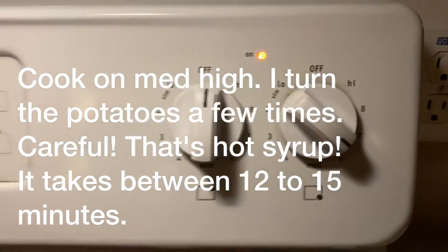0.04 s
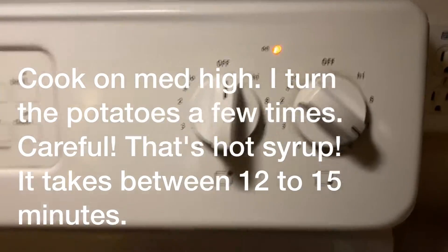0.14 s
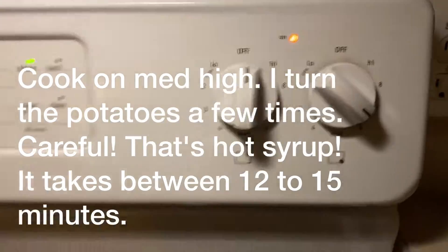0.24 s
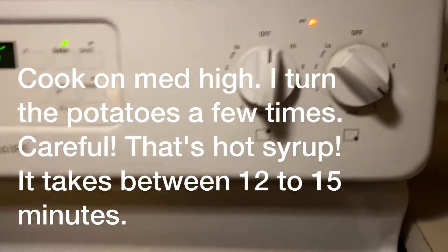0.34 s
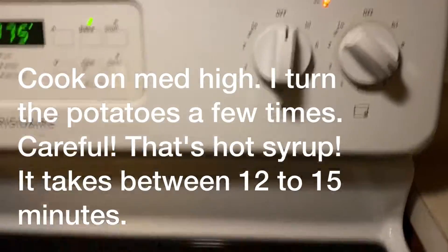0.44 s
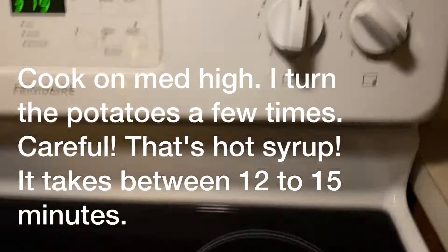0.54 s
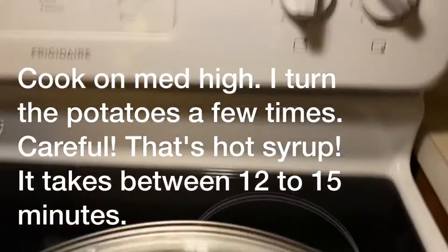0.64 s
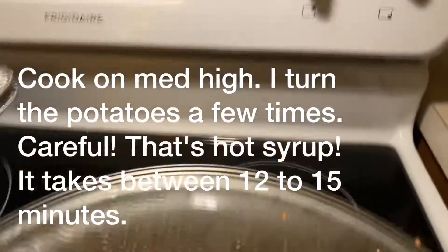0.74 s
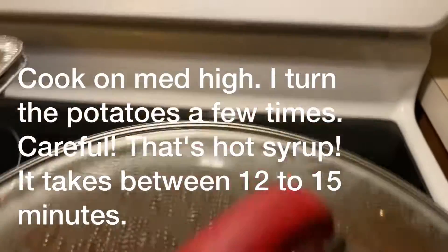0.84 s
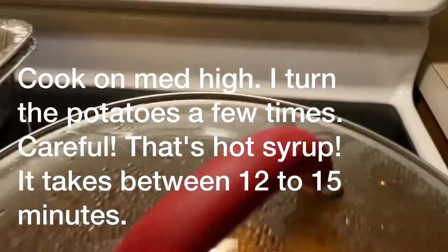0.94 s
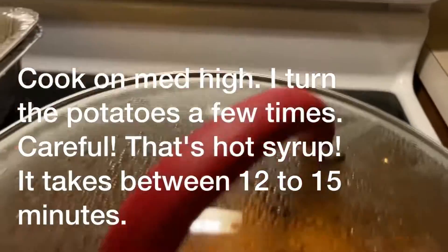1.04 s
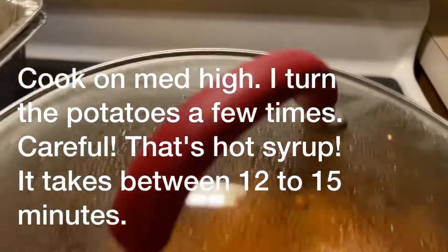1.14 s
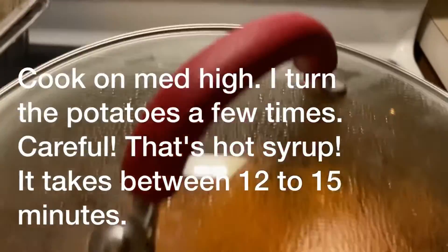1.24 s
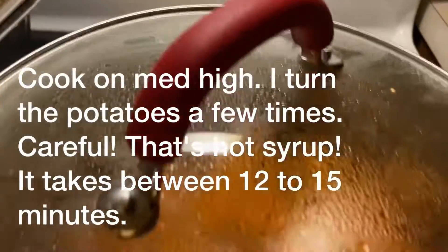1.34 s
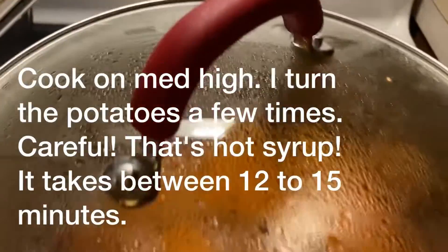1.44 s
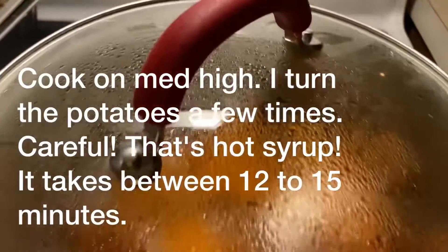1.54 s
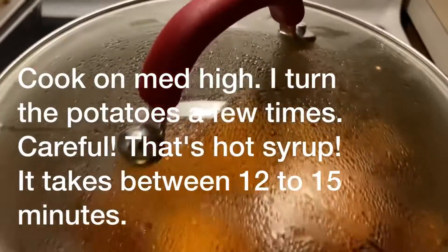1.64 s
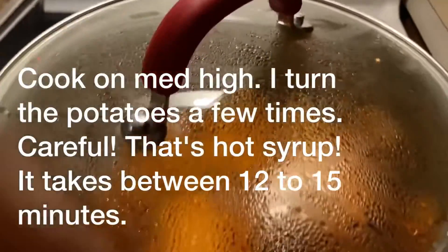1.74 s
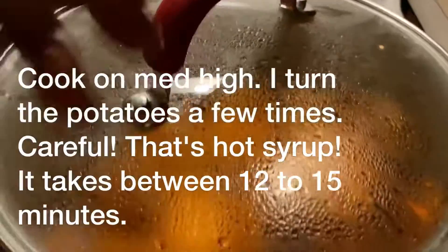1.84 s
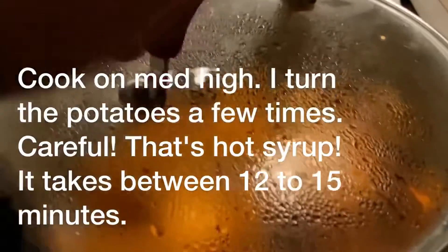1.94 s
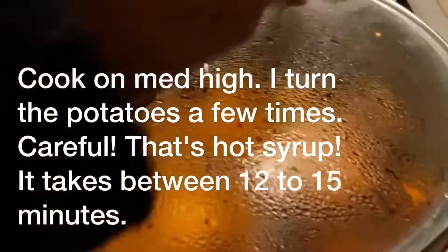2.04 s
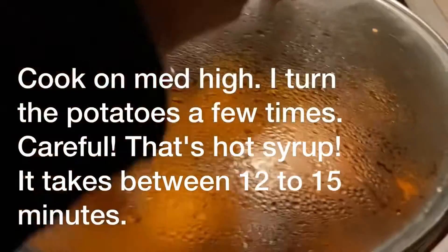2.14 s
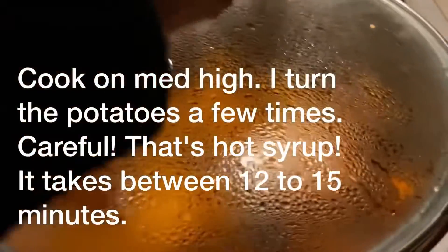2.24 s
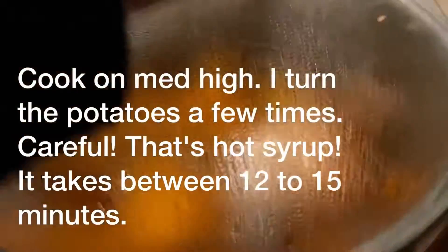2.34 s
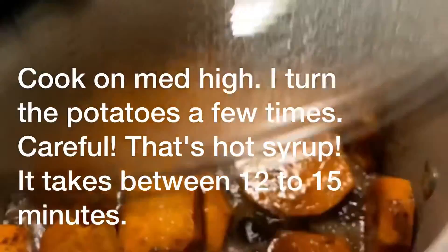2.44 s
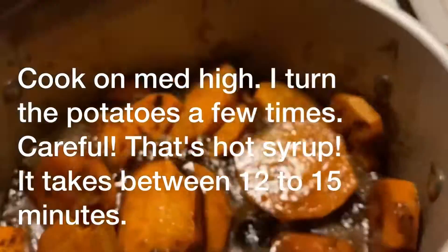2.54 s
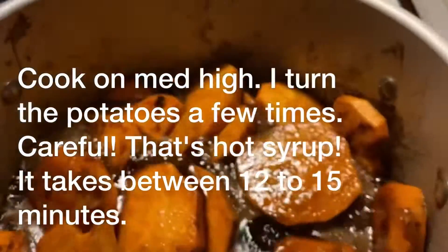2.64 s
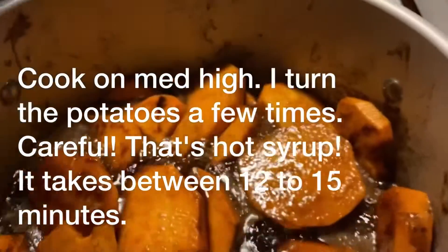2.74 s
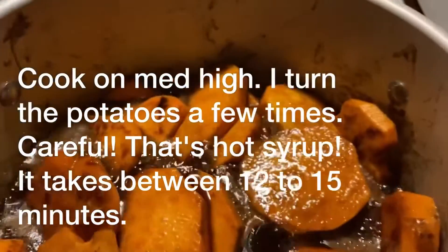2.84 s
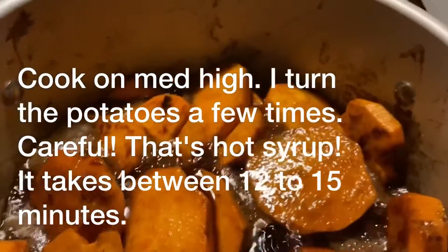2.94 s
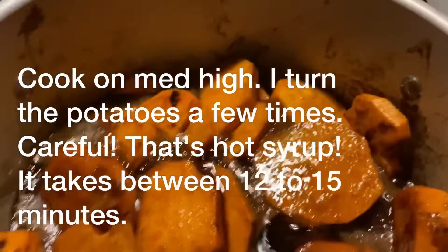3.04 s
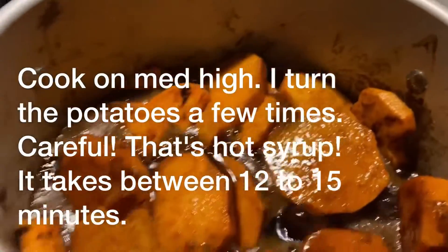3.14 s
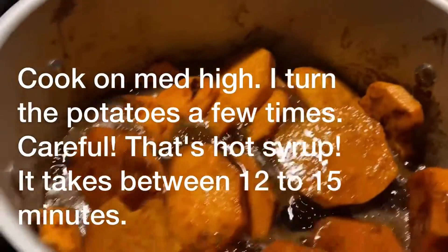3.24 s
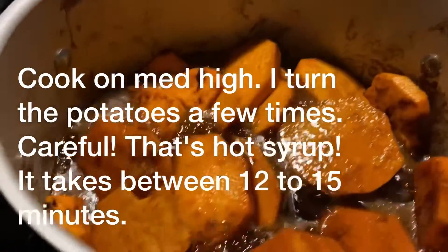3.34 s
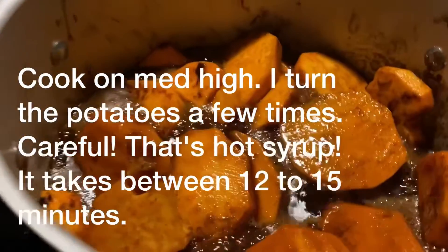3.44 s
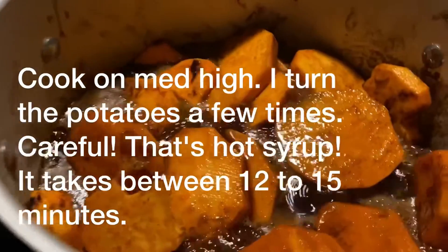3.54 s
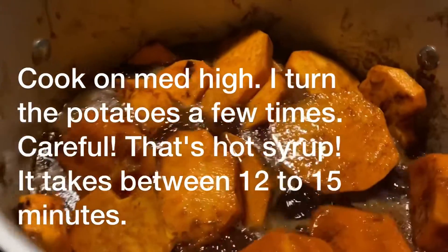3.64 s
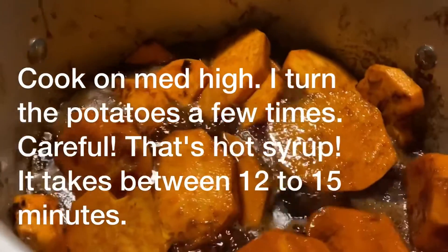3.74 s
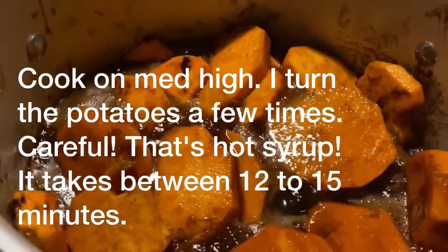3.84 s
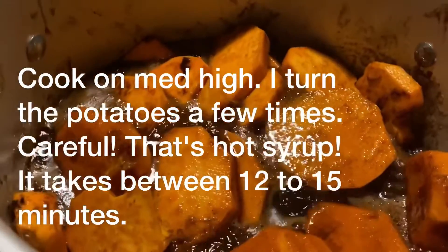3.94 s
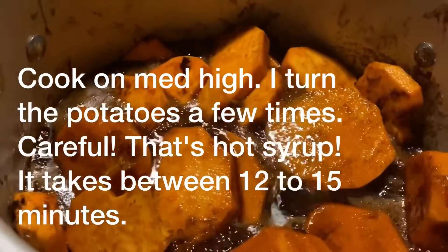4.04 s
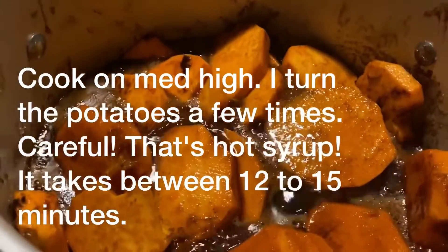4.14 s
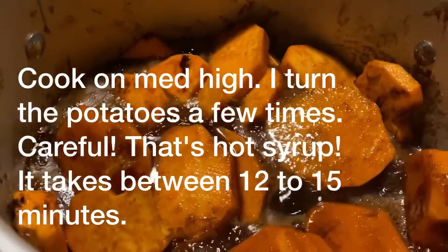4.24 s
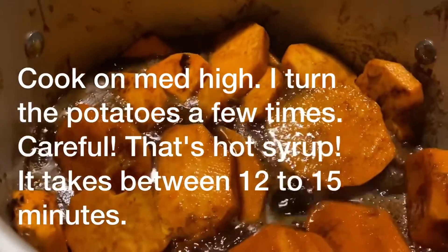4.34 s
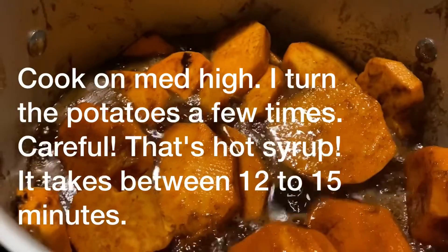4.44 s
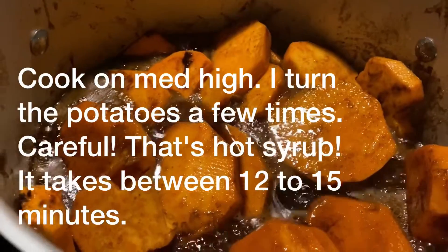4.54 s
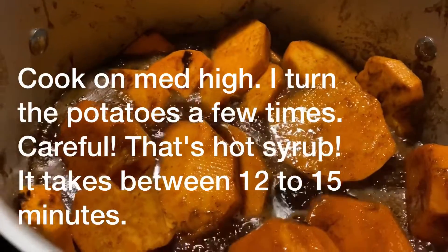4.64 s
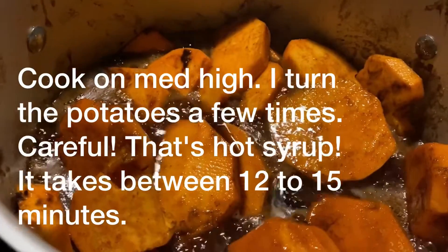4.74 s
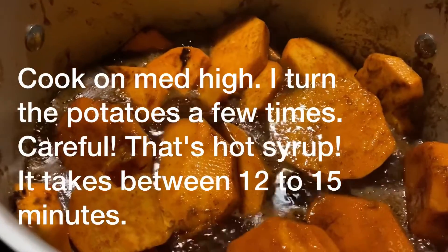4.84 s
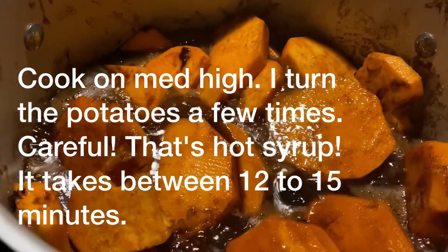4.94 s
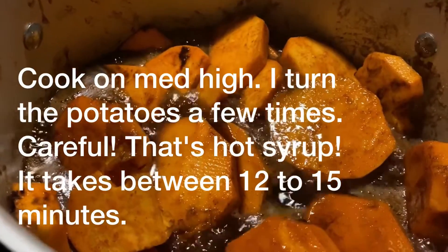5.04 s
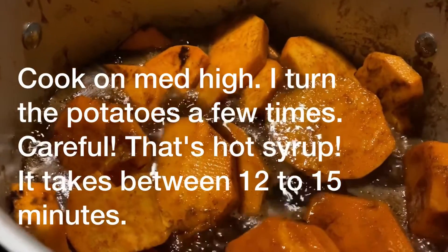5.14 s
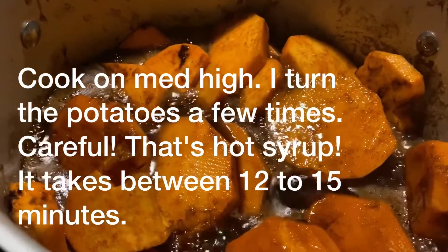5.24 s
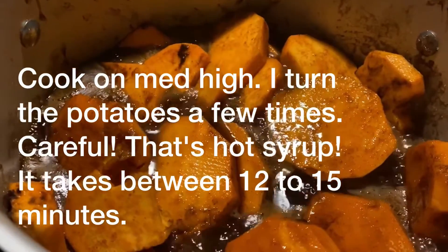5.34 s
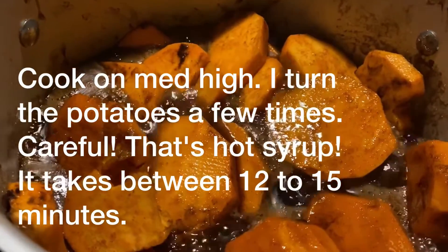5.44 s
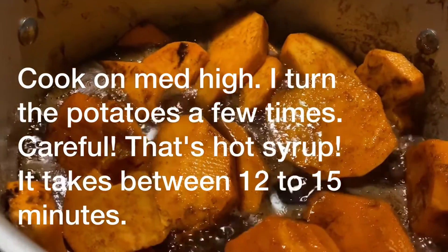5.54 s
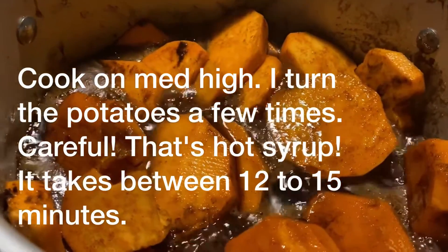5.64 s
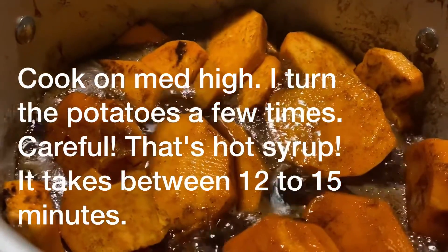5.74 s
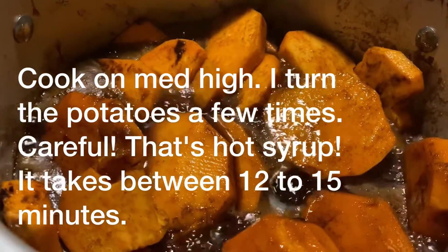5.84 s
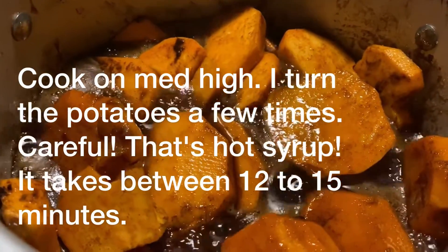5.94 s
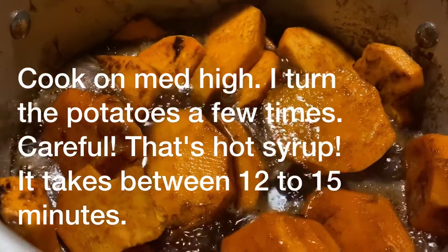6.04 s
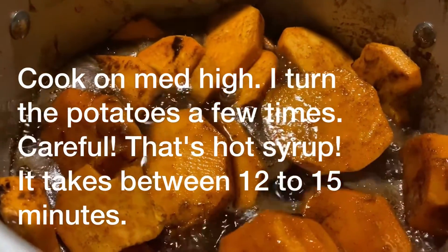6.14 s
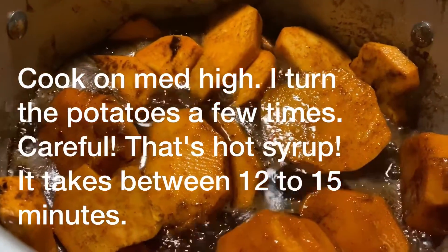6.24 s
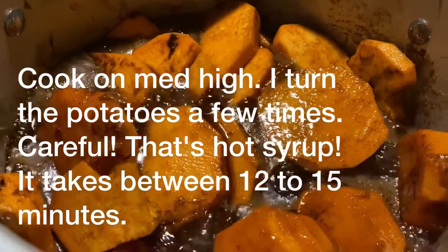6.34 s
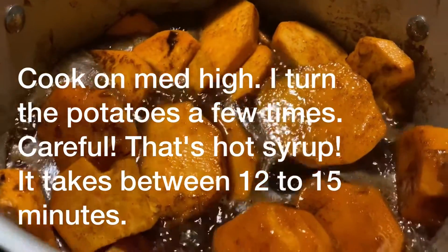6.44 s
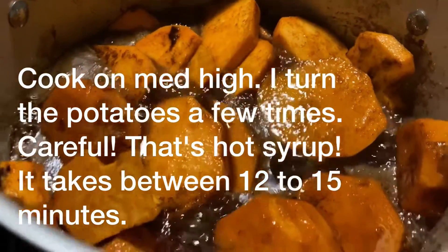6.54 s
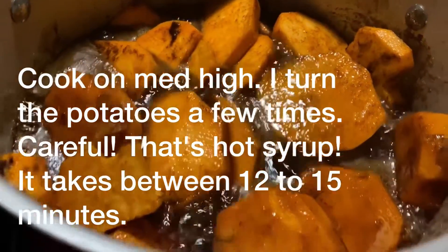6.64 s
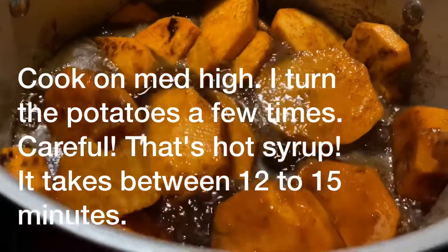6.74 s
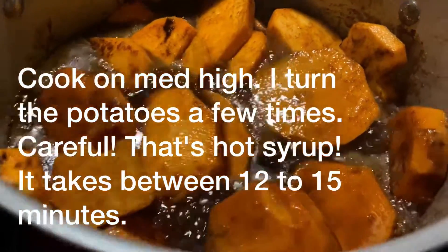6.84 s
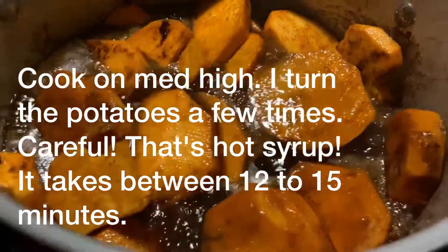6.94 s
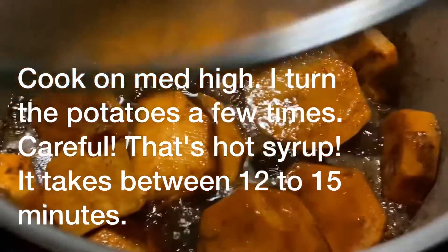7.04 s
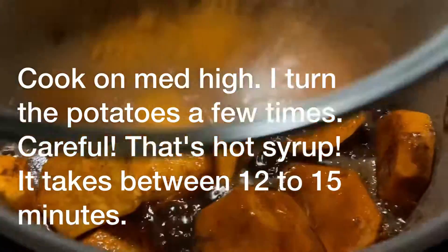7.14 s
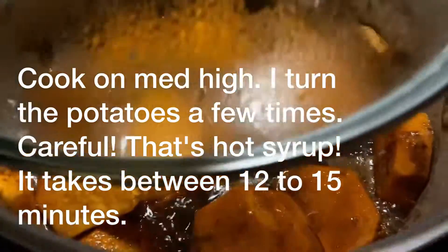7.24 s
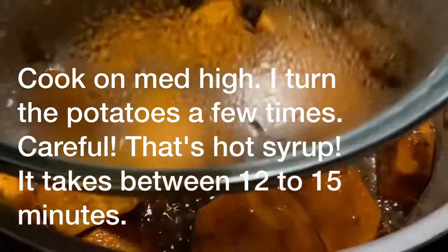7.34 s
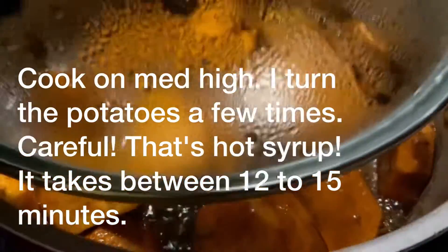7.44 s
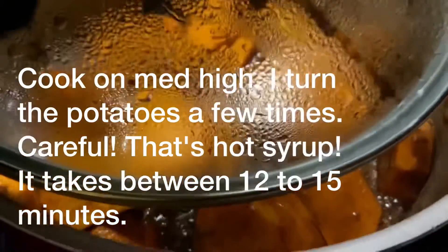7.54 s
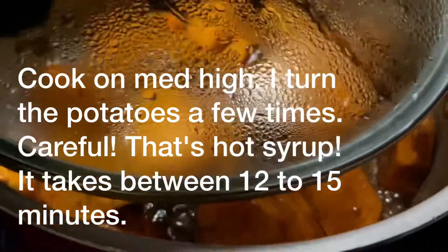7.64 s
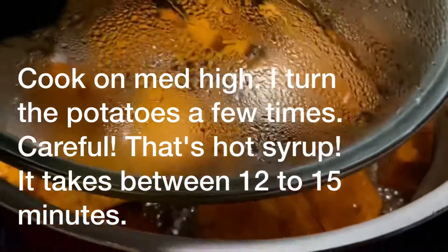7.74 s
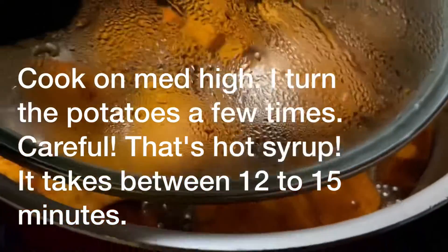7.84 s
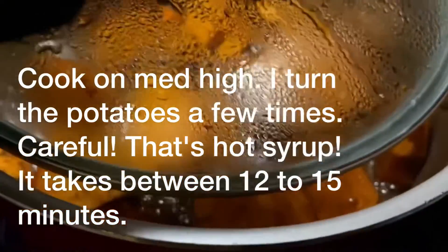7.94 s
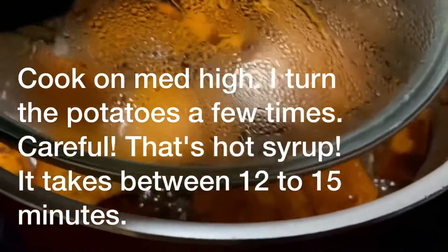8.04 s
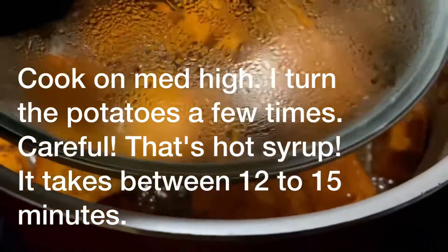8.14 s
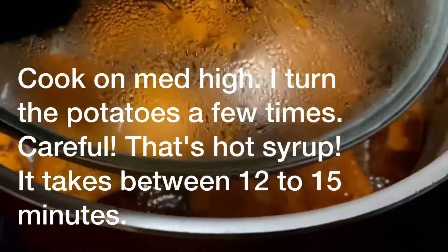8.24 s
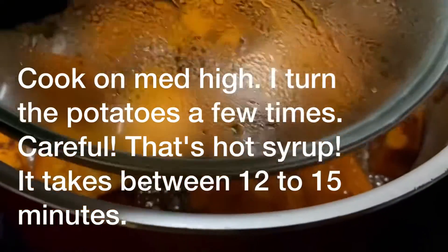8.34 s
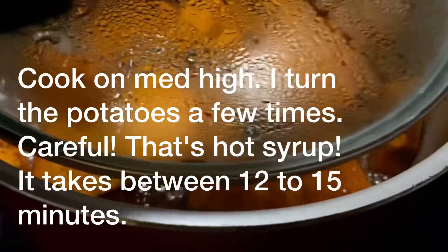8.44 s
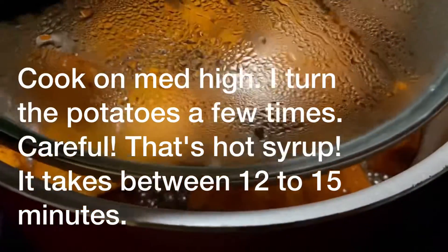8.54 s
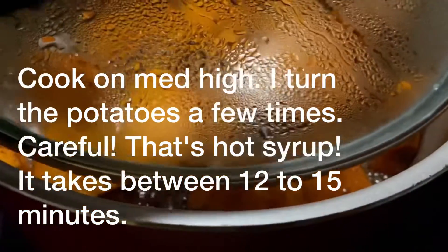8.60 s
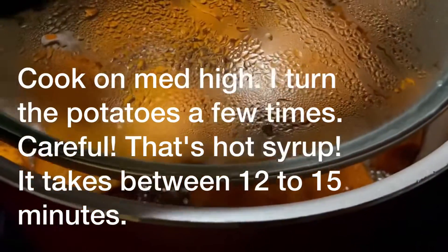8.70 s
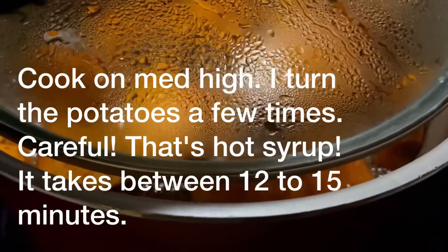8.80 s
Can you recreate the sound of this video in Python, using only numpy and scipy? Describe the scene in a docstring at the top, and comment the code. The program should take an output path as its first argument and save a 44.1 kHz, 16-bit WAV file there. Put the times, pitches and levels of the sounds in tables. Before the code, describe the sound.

Thick syrup gulps muffled under a glass lid, then bubbles open and crackling, before the lid clanks and scrapes back on, ajar.

```python
"""Thick syrup boils around sliced vegetables in a pot, heard from close above: damped sines gulp and blip
as bubbles, coloured by the pot's air resonances, which sound hollow and muffled under the glass lid.
Random ruptures make crackle, spatter and fizzing swells; shaped noise makes snaps, hiss, rubs, rumble and air.
The lid is lifted, the boil is heard open, then the lid knocks and scrapes back on as decaying struck modes
and chattering noise, and is left ajar."""
import sys
import numpy as np
from scipy import signal
from scipy.fft import rfft, irfft, next_fast_len
from scipy.io import wavfile
from scipy.ndimage import map_coordinates

SR = 44100
rng = np.random.default_rng(int(sys.argv[2]) if len(sys.argv) > 2 else 0)


def bounce(signal):
    """Save signal as a 16-bit WAV file at the path given by the first command-line argument."""
    frames = np.transpose(np.atleast_2d(signal))
    limited = np.clip(frames, -1, 1)
    pcm = np.round(limited * 32767).astype(np.int16)
    wavfile.write(sys.argv[1], SR, pcm)


N = 391166


def amp(db):
    """The decibel law: amplitude ratio of a level."""
    return 10 ** (np.asarray(db) / 20)


def unit(x):
    """Normalisation to an rms of 1."""
    return x / np.sqrt(np.mean(x ** 2) + 1e-20)


def peaked(x):
    """Normalisation to a peak of 1."""
    return x / (np.abs(x).max() + 1e-20)


def along(points, hz):
    """Interpolation of (Hz, value) points on a logarithmic frequency axis."""
    f, v = np.transpose(points)
    return np.interp(np.log(hz + 1), np.log(f + 1), v)


def curves(rows):
    """Linear interpolation in time: one value per sample for each column after the seconds."""
    s, *cols = np.transpose(rows)
    return [np.interp(np.arange(N) / SR, s, c) for c in cols]


def wobble(rate):
    """Band-limited random motion: a smooth curve through rate random knots a second."""
    return map_coordinates(rng.standard_normal(int(N * rate / SR) + 4), [np.arange(N) * rate / SR])


def swell(s, half_length):
    """Gaussian envelope: a smooth rise and fall around s seconds."""
    return np.exp(-((np.arange(N) / SR - s) / half_length) ** 2 / 2)


def filtered(x, response):
    """Linear filtering: the spectrum of x times a complex response of frequency."""
    n = x.shape[-1]
    m = next_fast_len(n + SR // 10)
    return irfft(rfft(x, m) * response(np.fft.rfftfreq(m, 1 / SR)), m)[..., :n]


def coloured(x, spectrum):
    """Spectral shaping of x by (Hz, dB) points."""
    return filtered(x, lambda hz: amp(along(spectrum, hz)))


def noise(side_db, size=N):
    """Partly coherent white stereo noise: a common part and an opposed one, side_db relative to it."""
    mid, side = rng.standard_normal((2, size))
    return np.array([mid + amp(side_db) * side, mid - amp(side_db) * side])


def add(track, s, x):
    """Superposition: mix x into the track at s seconds."""
    i = max(0, round(s * SR))
    track[:, i:i + x.shape[-1]] += x[:, :max(0, N - i)]


def cavity(x, modes):
    """Cavity resonance: x heard through band-pass modes of (Hz, width in Hz, dB), alternating in sign."""
    def response(f):
        total = 0
        for k, (centre, width, db) in enumerate(modes):
            damping = 1j * f * width
            total = total + amp(db) * (-1) ** k * damping / (centre * centre - f * f + damping)
        return total
    return filtered(x, response)


def bubbles(start, hz, gain, cycles, rise, spread, length, size):
    """Bubble pulsation: damped sines swell in about `cycles` periods, pitch rising, each with its own place."""
    age = np.arange(size) / SR * np.reshape(hz, (-1, 1))  # in cycles
    life, pan, lead = rng.standard_normal((len(age), 3)).T[:, :, None]
    u = age / (cycles * np.exp(0.61 * life))
    fade = np.linspace(1, 0, size) ** .5
    envelope = np.reshape(gain, (-1, 1)) * u * np.exp(1 - u) * fade
    phase = 2 * np.pi * age * (1 + rise * u / (u + 2))
    at = (np.reshape(start, (-1, 1)) * SR).astype(int) + np.arange(size)
    ports = []
    for side in (1, -1):  # left, right
        heard = envelope * np.exp(side * spread * pan / 2) * np.sin(phase + side * spread * lead)
        ports.append(np.bincount(at.ravel(), heard.ravel(), length)[:length])
    return np.array(ports)


# Spectrum of rupturing films. Each row: frequency in Hz, relative level in dB.
SIZZLE = [(600, -16), (1500, 1.5), (2500, 4.5), (5000, 0), (7000, -2), (10000, -8), (13000, -8.5),
          (16000, -20)]
FLECK_S = .0008  # time constant of the decay of one tiny rupture


def crackle(density, side_db, pitched_db):
    """Random impulse trains: noise flecks and pitched droplets of uneven size, density of each a second."""
    size = len(density)

    def ruptures():
        size_db = 3.3 * np.minimum(rng.exponential(size=size), 3.6)
        return (rng.random(size) < density / SR) * amp(size_db)

    age = np.arange(SR // 100) / SR / FLECK_S
    envelopes = signal.fftconvolve(ruptures(), age ** .5 * np.exp(-age))[:size]
    flecks = coloured(envelopes * noise(side_db, size), SIZZLE)
    drops = ruptures()
    at = np.flatnonzero(drops)
    hz = 1500 * (12000 / 1500) ** rng.random(len(at))
    gain = drops[at] * hz ** .7 * amp(along(SIZZLE, hz))
    droplets = bubbles(at / SR, hz, gain, cycles=1.3, rise=0.05, spread=0.3, length=size, size=260)
    return unit(unit(flecks) + amp(pitched_db) * unit(droplets))


# Air resonances of the pot with the lid shut, off and ajar.
# Each row: frequency in Hz, width in Hz, relative level in dB.
POT_SHUT = [(187, 59, -6), (278.6, 73.7, 0), (336, 36, 2), (794, 197, -19), (1034, 67, -9.5),
            (1945, 65, -18)]
POT_OPEN = [(139, 84, -4), (322, 90, 0.5), (509.4, 89.5, 1), (790, 230, -9.5), (1143, 110, -3),
            (2000, 93, -20.5)]
POT_AJAR = [(141, 113, -6), (325.4, 36, 10), (403, 150, -5.5), (1008, 61, -3)]
# Lid position. Each row: time in seconds, weight of shut (0 to 1), weight of ajar (0 to 1).
LID = [(2.26, 0.87, 1), (2.46, 0.13, 0), (7.15, 0.014, 0.027), (7.6, 0.02, 0.93), (8.4, 0.18, 0.86)]


def lid_states():
    """Modal weighting: the pot's resonances with their weight at each moment; open takes what is left of 1."""
    shut, ajar = np.clip(curves(LID), 0, 1)
    return [(POT_SHUT, shut), (POT_AJAR, ajar), (POT_OPEN, np.clip(1 - shut - ajar, 0, 1))]


# Quiet air of the room. Each row: frequency in Hz, relative level in dB.
AIR = [(40, 12.5), (200, -9), (500, -10), (1300, -18), (2200, -48), (5000, -23), (10000, -68), (16000, -64)]


def room_air():
    """Stationary background noise: wide, steady noise shaped by a fixed spectrum."""
    return amp(-63.0) * unit(coloured(noise(side_db=10.0), AIR))


# Reverberation of the room. Each row: frequency in Hz, time to fall 60 dB in seconds.
KITCHEN = [(100, 0.067), (1000, 0.14), (5000, 0.16), (15000, 0.016)]


def kitchen(x):
    """Frequency-dependent reverberation: each band of the room's answer dies at its own speed."""
    hz, t, z = signal.stft(rng.standard_normal((2, SR // 2)), SR, nperseg=256)
    decay = amp(-60 * t / along(KITCHEN, hz)[:, None])
    tail = signal.istft(z * decay, SR, nperseg=256)[1]
    return signal.fftconvolve(x, tail / np.linalg.norm(tail[0]), axes=1)[:, :N]


# Bass spectrum of the shaken pot. Each row: frequency in Hz, relative level in dB.
LOW = [(22, -30), (36, -8), (52, -3.5), (95, 3.5), (150, -3), (220, -12.5), (400, -38), (900, -43.5)]
# How hard the syrup churns. Each row: time in seconds, relative level in dB.
BOIL = [(0.0, -55), (0.94, -50), (1.16, -56), (2.67, -48), (3.58, -52.5), (4.91, -47), (7.39, -48.5),
        (7.81, -43), (8.42, -41.5), (8.87, -46)]


def rumble():
    """Structure-borne vibration: the boil shakes pot and stove top in uneven lumps, more when it churns."""
    lumps = amp(3.9 * wobble(14) + 0.5 * curves(BOIL)[0])
    return amp(-50.5) * unit(lumps * coloured(noise(side_db=-19), LOW))


# Soft rubs at the shut lid. Each row: middle in seconds, half length in seconds, level in dB.
RUBS = [(.033, 0.098, -65.5), (.64, 0.067, -62), (1.95, 0.093, -62)]
# Resonances the rubs wake. Each row: frequency in Hz, width in Hz, relative level in dB.
RUBBED = [(1070, 380, -2), (1640, 84, 4), (2170, 350, -2.1)]


def rubs():
    """Friction excitation: soft grainy rubs wake resonances before the lid is lifted."""
    grainy = noise(side_db=-15) * amp(5 * wobble(110))
    strokes = sum(amp(db) * swell(s, length) for s, length, db in RUBS)
    return strokes * unit(cavity(grainy, RUBBED))


DETUNE = .04  # relative; the hand and the point of contact shift every mode from blow to blow


def ring(modes, t, attack, rough):
    """Modal synthesis: struck modes, new strengths each blow, shaken by contact; low ones swell slowest."""
    tone = 0
    for hz, db, t60 in modes:
        hz = hz * np.exp(DETUNE * rng.standard_normal())
        ratio = hz / modes[0][0]
        level = db + 2 * rng.standard_normal()
        shake = rough * np.cumsum(rng.standard_normal(len(t))) / np.sqrt(SR / 100)  # chattering contact
        envelope = amp(level - 60 * t / t60) * (1 - np.exp(-t * ratio / attack))
        port_phase = rng.normal(0, 0.23, (2, 1))
        tone = tone + envelope * np.sin(2 * np.pi * (hz * t + rng.random()) + shake + port_phase)
    return peaked(tone)


# Modes of the pot's weight on the stove top, its hollow body, the struck rim and the glass lid.
# Each row: frequency in Hz, relative level in dB, time to fall 60 dB in seconds.
THUD = [(65.6, 0.5, 0.18), (152.9, -1.5, 0.23), (193, -0.5, .13), (268.6, -3.5, 0.12)]
CLANK = [(322.5, -0.5, 0.047), (405.3, 1.5, 0.063), (540, -4, 0.051)]
RIM = [(1047, 7, 0.049), (857, 4.5, 0.013), (1573, -8, 0.058)]
GLASS = [(2287, 2, 0.062), (2800, 0, 0.12), (3230, 6.5, 0.05), (4040, -1.5, 0.046), (5630, 1, 0.055),
         (10400, -17.5, 0.06)]
# The lid meets the rim.
# Each row: start in seconds, then relative level in dB of the thud, the clank, the rim and the clink.
KNOCKS = [(2.255, -22.5, -29.5, -47, -44), (2.341, -36.5, -37, -42, -45),
          (7.515, -24.5, -21.5, -36.5, -29.5), (7.556, -28, -39, -44, -41), (7.601, -35, -26.5, -37.5, -51),
          (7.659, -51, -35, -45, -40.5), (7.728, -48, -36.5, -37.5, -52), (7.764, -54, -36, -36.5, -37.5),
          (7.838, -19.5, -17, -38, -25.5), (7.917, -33, -26, -35.5, -56), (7.986, -44, -34, -41, -41),
          (8.102, -32, -30, -29.5, -39.5), (8.261, -28.5, -31.5, -49, -40.5), (8.316, -30, -23, -29.5, -62)]
CLUNK_HZ, CLUNK_S = 396, 0.004  # the air pushed by the landing lid: pitch, seconds to its peak


def knocks():
    """Impact excitation: the lid's edge clinks on the rim, the pot clanks, its weight thuds on the stove."""
    out, t = np.zeros((2, N)), np.arange(SR // 2) / SR
    u = t / CLUNK_S
    crack_spectrum = [(600, 8), (2300, 8), (6000, 1), (15000, -9.5)]  # (Hz, dB)
    for s, thud_db, clank_db, rim_db, clink_db in KNOCKS:
        burst = noise(side_db=-37, size=len(t)) * amp(-60 * t / 0.032)
        crack = peaked(coloured(burst, crack_spectrum))
        glass = ring(GLASS, t, attack=0.00039, rough=1.0)
        clunk = (u * np.exp(1 - u)) ** 4 * np.sin(2 * np.pi * (CLUNK_HZ * t + rng.random()))
        body = ring(CLANK, t, attack=0.005, rough=0.5)
        add(out, s + .001, amp(clink_db + 0.5) * crack + amp(clink_db - 3.5) * glass)
        add(out, s + 0.00112, amp(rim_db) * ring(RIM, t, attack=0.00085, rough=0.79))
        add(out, s + .001, amp(clank_db) * (clunk + amp(-1.5) * body))
        add(out, s + .004, amp(thud_db) * ring(THUD, t, attack=0.028, rough=0.43))
    return out * amp(0.65 * np.array([[1], [-1]]))  # a little stronger on the left


# The lid slides on the rim. Each row: middle in seconds, half length in seconds, level in dB.
SLIDES = [(2.362, 0.021, -45.5), (7.651, 0.027, -39), (7.829, 0.016, -36.5), (7.954, 0.037, -41.5),
          (8.274, 0.11, -45)]


def drag():
    """Stick-slip friction: the sliding lid scrapes and chatters on the rim, shakes the body, rocks the pot."""
    catches = amp(6 * np.tanh(wobble(60))) * noise(side_db=-16)

    def shaken(modes):
        damped = [(hz, hz / 6, db) for hz, db, t60 in modes]  # the contact damps the modes
        return unit(cavity(catches, damped))

    rattle = shaken(CLANK) + amp(-8) * shaken(RIM) + amp(-4) * shaken(THUD)
    rattle = rattle + amp(-5) * unit(coloured(catches, LOW))
    return sum(amp(db) * swell(s, length) for s, length, db in SLIDES) * unit(rattle)


LULL_DB, LULL_S = -6, .008  # calm before a burst: depth, time scale in seconds
BUSY_DB, BUSY_S = 2.5, .007  # stir after it: height, time scale in seconds


def lull():
    """Amplitude modulation: the surface is still while a big bubble swells, busier just after its burst."""
    marks = np.bincount((np.array(BURSTS)[:, 0] * SR).astype(int), minlength=N)
    lag = np.arange(-SR // 10, SR // 10 + 1) / SR
    calm_db = LULL_DB * np.exp(-((lag + 0.0091) / LULL_S) ** 2)
    stir_db = BUSY_DB * np.exp(-((lag - .025) / BUSY_S) ** 2)
    return amp(signal.fftconvolve(marks, calm_db + stir_db, mode="same"))


# Transmission of crackle through the shut lid. Each row: frequency in Hz, relative level in dB.
THROUGH_LID = [(1000, -22), (2800, -3.5), (6000, -6), (15000, -12)]


def sizzle():
    """Transmission loss: films crackle in flurries over a hiss of steam, and the lid dulls them."""
    shut, ajar = np.clip(curves(LID), 0, 1)
    covered = np.maximum(shut, 0.63 * ajar)
    flurry = amp(14 * np.tanh(wobble(22)))
    films = lull() * crackle(55 * flurry, side_db=-8, pitched_db=-1)
    hiss = coloured(noise(side_db=2.5), [(500, 4.5), (2000, 3.5), (5500, -5.0), (15000, -55)])
    heard = (1 - covered) * films + covered * amp(-11) * coloured(films, THROUGH_LID)
    return amp(-61) * heard + amp(-66.5 - 4.8 * shut) * unit(hiss)


# Short fizzing swells: two soft swishes while the lid is shut, then spits from the open boil.
# Each row: middle in seconds, half length in seconds, relative level in dB.
FIZZES = [(0.853, .019, -64.5), (1.577, .036, -65), (4.608, 0.011, -48.5), (5.235, 0.0061, -48.5),
          (6.137, 0.013, -49.5), (6.844, 0.021, -55), (7.26, 0.016, -53.5)]


def fizzing_swells():
    """Enveloped noise: dense crackle and noise through the pot's air modes rise and fall together."""
    swells = sum(amp(db) * swell(s, length) for s, length, db in FIZZES)
    fizz = crackle(np.full(N, 1100), side_db=-8, pitched_db=0)
    pot_air = unit(cavity(noise(side_db=-15), POT_OPEN))
    return swells * (fizz + amp(5.0) * pot_air)


# Syrup films snapping. Each row: start in seconds, peak level in dB, centre frequency in Hz.
SNAPS = [(2.822, -34, 4300), (2.948, -33, 9050), (3.153, -30.5, 4540), (3.444, -36, 3900),
         (3.589, -39.5, 6400), (3.781, -34.5, 7800), (3.884, -36.5, 7850), (4.1347, -47, 6430),
         (4.152, -43, 7300), (4.72, -34, 9000), (4.824, -39.5, 4130), (4.881, -38, 6440),
         (4.9597, -32.5, 3050), (5.0706, -32.5, 3840), (5.825, -36, 7100), (5.872, -33.5, 5530),
         (5.888, -33.5, 4470), (6.0834, -36.5, 6000), (6.386, -36.5, 3420), (6.816, -27.5, 7100),
         (6.867, -37, 9000), (8.54, -32.5, 7100)]


def snaps(size=3000):
    """Sudden release of tension: each film gives a sharp, broad crack around its own centre frequency."""
    out, t = np.zeros((2, N)), np.arange(size) / SR
    for s, db, centre_hz in SNAPS:
        decay = amp(-60 * t / .016) + amp(-25 - 60 * t / .06)
        tear = noise(side_db=-12, size=size) * decay
        crack = filtered(tear, lambda hz: amp(-7 * np.log2((hz + 1) / centre_hz) ** 2))
        add(out, s, amp(db) * peaked(crack))
    return out


# Smaller bubbles at the surface. Each row: start in seconds, level in dB, pitch in Hz.
PLOPS = [(2.792, -40, 920), (2.825, -40, 860), (3.444, -36.5, 1000), (3.878, -25.5, 1040),
         (3.938, -30.5, 1000), (4.877, -36, 935), (4.916, -34, 1070), (5.147, -34.5, 637),
         (5.436, -31.5, 983), (6.054, -34, 880), (6.224, -33.5, 1080), (6.568, -31, 920),
         (6.802, -32, 1014)]


def plops():
    """Free bubble oscillation: bubbles at the surface ring briefly at their own rising pitch."""
    s, db, hz = np.transpose(PLOPS)
    return bubbles(s, hz, amp(db), cycles=0.9, rise=0.1, spread=0.16, length=N, size=900)


def clumped(clump_db, rate, count):
    """Inhomogeneous random process: times crowd together in flurries, with gaps between them."""
    density = np.cumsum(amp(clump_db * np.tanh(wobble(rate))))
    return np.searchsorted(density, rng.random(count) * density[-1]) / SR


WAVER, WAVER_PER_S = .04, 22  # scale of the relative drift, and its random knots a second


def wavering(x):
    """Time-base modulation: the pitch of x drifts quickly up and down, as the surface heaves."""
    at = np.arange(N)
    drifted = at + WAVER * SR / WAVER_PER_S * wobble(WAVER_PER_S)
    return np.array([np.interp(drifted, at, side) for side in x])


def churn(count=4200):
    """Forced cavity resonance: a crowd of small, quickly damped, uneven bubbles sounds the pot's air."""
    hz = 180 * (2400 / 180) ** rng.random(count)
    size_db = 4.7 * np.minimum(rng.exponential(size=count), 2.2)
    start = clumped(clump_db=9, rate=46, count=count)
    gain = amp(size_db) * np.sqrt(hz)
    crowd = bubbles(start, hz, gain, cycles=0.48, rise=0.12, spread=0.16, length=N, size=700)
    states = lid_states()
    heard = wavering(sum(share * unit(cavity(crowd, modes)) for modes, share in states))
    open_share = states[-1][1]
    tearing_skins = open_share * unit(coloured(crowd[0] * noise(side_db=-25), SIZZLE))
    return amp(curves(BOIL)[0] + 1.5) * lull() * (heard + amp(-23.5) * tearing_skins)


def spatter(swell_s, size):
    """Droplet shower: a torn skin throws ruptures that swell and die, some showers finer and brighter."""
    u = np.arange(size) / SR / swell_s
    shower = u ** .5 * np.exp(-u)
    spray = unit(crackle(1200 * shower + 100, side_db=-29, pitched_db=-3.5) * shower)
    fineness_db = 2 * rng.standard_normal()  # per octave
    return filtered(spray, lambda hz: amp(fineness_db * np.log2(np.maximum(hz, 1000) / 4500)))


# Big bubbles.
# Each row: start in seconds, relative level in dB, pitch in Hz, relative level of the spatter in dB.
BURSTS = [(0.116, -35, 318, -70), (0.276, -32.5, 325, -65), (0.626, -35.5, 275, -65),
          (0.941, -34, 307.6, -81), (0.959, -31, 281, -76), (1.354, -33.5, 267, -79),
          (1.389, -32, 312, -63.5), (1.879, -31, 251, -64), (2.211, -32.5, 273, -79),
          (2.444, -38.5, 480, -72), (2.697, -31, 333, -51.5), (2.791, -27.5, 540, -77),
          (2.822, -26, 413, -48), (2.938, -29, 320, -53), (3.343, -29.5, 297, -54.5),
          (3.407, -27.5, 320, -57.5), (3.748, -31.5, 450, -56.5), (3.967, -35.5, 397, -52.5),
          (4.02, -29, 427, -60), (4.129, -28.5, 316, -51.5), (4.477, -30.5, 318, -65),
          (4.563, -25.5, 376, -53.5), (4.959, -22.5, 385, -54.5), (5.109, -28.5, 331, -52.5),
          (5.246, -25.5, 460, -57), (5.431, -31.5, 485, -49.5), (5.783, -29.5, 390, -53),
          (5.798, -28.5, 470, -74), (5.966, -33, 567, -61), (6.19, -28.5, 410, -58), (6.305, -34, 533, -58),
          (6.386, -27, 320, -52), (6.565, -24, 378, -51), (6.66, -39, 620, -68), (6.943, -31, 460, -83),
          (7.057, -33, 310, -56.5), (7.179, -29.5, 340, -80), (7.244, -26.5, 437, -57.5),
          (8.371, -24.5, 322, -57), (8.591, -26.5, 333, -72), (8.65, -22, 304, -55.5),
          (8.806, -23.5, 301, -57)]
# up to a limit, a smaller, higher bubble sets off a stronger blip; the lid muffles it, less when ajar
BLIP_DB, BLIP_DB_PER_OCTAVE, USUAL_GULP_HZ = -11, 3, 353
BLIP_SHUT_DB, BLIP_AJAR_DB = -14, -10


def bursts(size=4400):
    """Bubble collapse into a cavity: each gulps into the pot's air, blips, spatters, and the syrup heaves."""
    out, states, (shut, ajar) = np.zeros((2, N)), lid_states(), curves(LID)
    t = np.arange(size) / SR
    for s, db, hz, spatter_db in BURSTS:
        i = int(s * SR)

        def pot(x):
            return peaked(sum(share[i] * peaked(cavity(x, modes)) for modes, share in states if share[i] > 0))

        blip_db = db + min(BLIP_DB + BLIP_DB_PER_OCTAVE * np.log2(hz / USUAL_GULP_HZ), 0)
        blip_db = blip_db + BLIP_SHUT_DB * shut[i] + BLIP_AJAR_DB * ajar[i]
        blip_hz = 1020 * np.exp(rng.normal(0, 0.019))
        heave_hz = 105 * np.exp(rng.normal(0, 0.338))
        gulp = bubbles(0, hz, 1, cycles=0.38, rise=0.022, spread=0.14, length=size, size=1500)
        blip = bubbles(0, blip_hz, 1, cycles=0.69, rise=0.052, spread=0.16, length=size, size=700)
        sputter = noise(side_db=-21, size=size) * t * np.exp(-t / 0.0051)
        heave = bubbles(0, heave_hz, 0.82, cycles=1.0, rise=0, spread=0.043, length=size, size=size)
        add(out, s, amp(db + .5) * pot(gulp))
        add(out, s - .003, amp(db - 6.5) * pot(sputter))
        add(out, s, amp(db - 14.5) * heave)
        add(out, s + 0.00095, amp(blip_db) * pot(blip))
        add(out, s - .001, amp(spatter_db - 7.0) * spatter(swell_s=0.0099, size=size))
    return out


def scene():
    """Superposition of sources: the pot and its reverberation in the kitchen, over the room's quiet air."""
    pot = knocks() + drag() + sizzle() + fizzing_swells() + snaps() + plops() + churn() + bursts()
    return room_air() + rumble() + rubs() + amp(-14) * kitchen(pot) + pot


# Level balance of the two microphone ports. Each row: frequency in Hz, left minus right in dB.
BALANCE_DB = [(100, 1), (250, 1.9), (500, 4.2), (800, 5), (1150, 1.8), (2000, 2), (4800, 5), (6500, .5),
              (15000, 0)]
# Phase between the ports. Each row: frequency in Hz, lead of the left in radians.
LEAD = [(60, 0), (300, .25), (550, .5), (900, -.1), (2200, .7), (5800, .6), (7300, -.1), (8800, -3),
        (9700, -3.8), (10700, -6.1), (11500, -6.5), (13100, -9.4), (14000, -10.2), (15200, -12.6)]
LOW_CUT_HZ, TOP_HZ = 36, 16100


def record(dry):
    """Two-port reception: ports differ in level and phase; deep bass and all above the band limit are cut."""
    half = np.array([[.5], [-.5]])  # left, right

    def response(hz):
        ports = amp(half * along(BALANCE_DB, hz)) * np.exp(1j * half * along(LEAD, hz))
        low_cut = hz ** 3 / np.hypot(hz ** 3, LOW_CUT_HZ ** 3)
        return ports * low_cut * (hz < TOP_HZ)

    return filtered(dry, response)


dry = scene()
out = record(dry)
bounce(out)
```